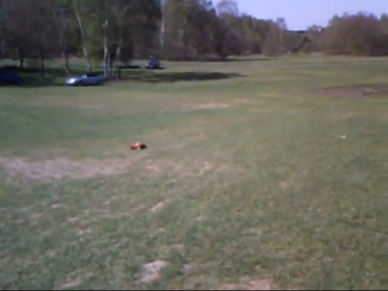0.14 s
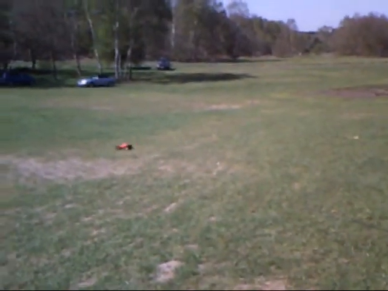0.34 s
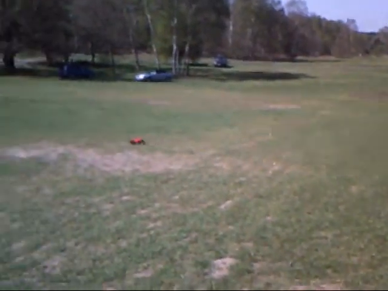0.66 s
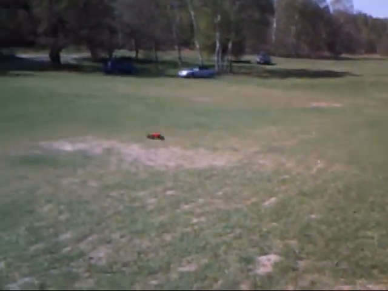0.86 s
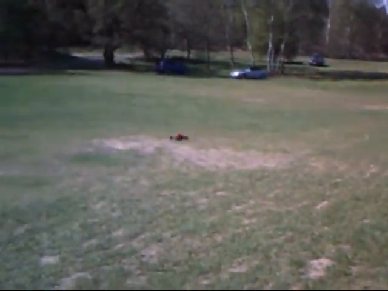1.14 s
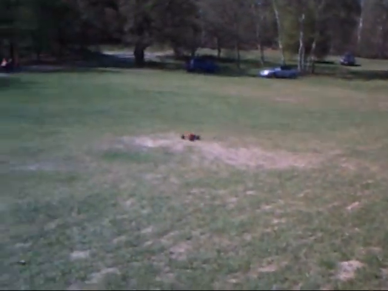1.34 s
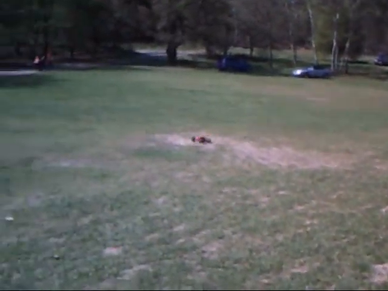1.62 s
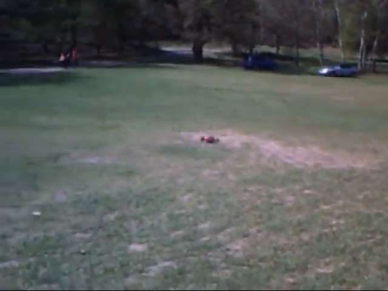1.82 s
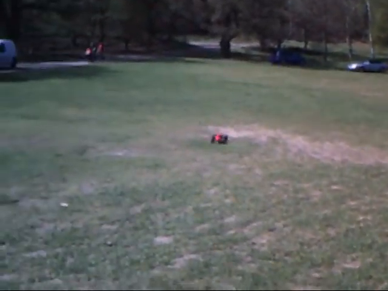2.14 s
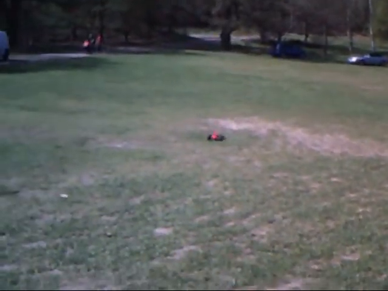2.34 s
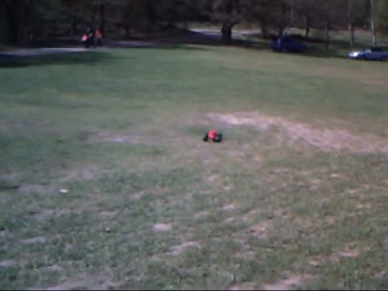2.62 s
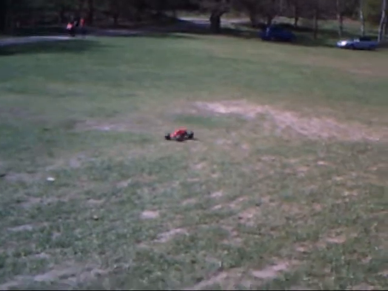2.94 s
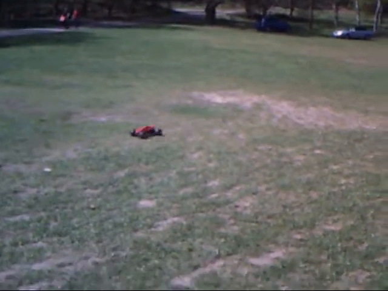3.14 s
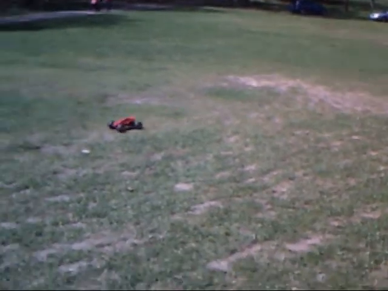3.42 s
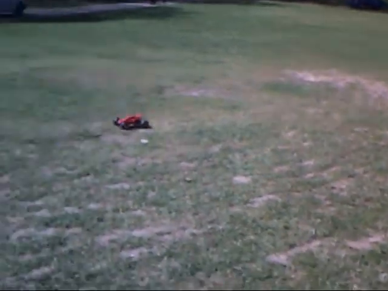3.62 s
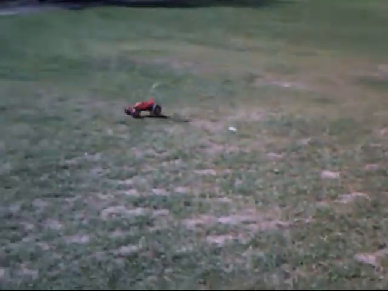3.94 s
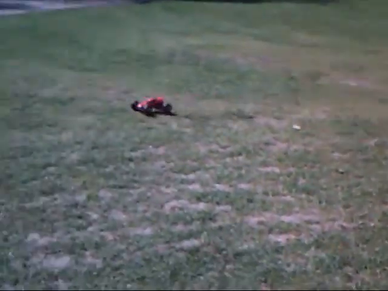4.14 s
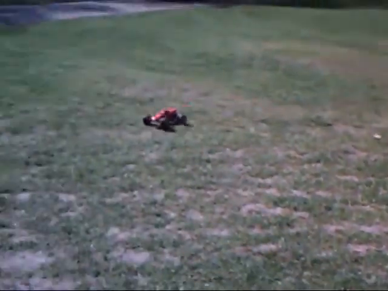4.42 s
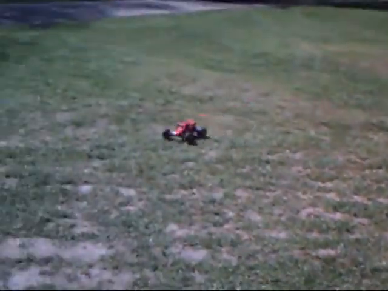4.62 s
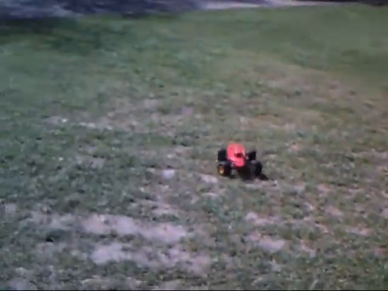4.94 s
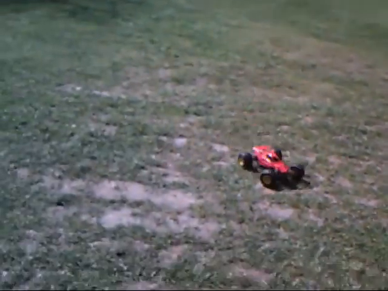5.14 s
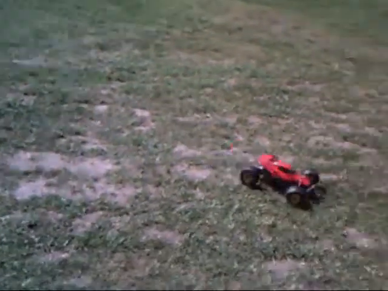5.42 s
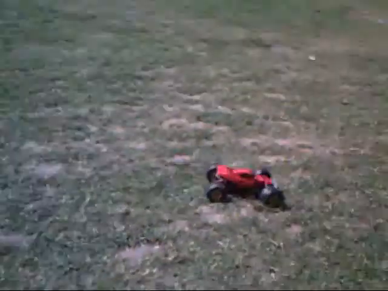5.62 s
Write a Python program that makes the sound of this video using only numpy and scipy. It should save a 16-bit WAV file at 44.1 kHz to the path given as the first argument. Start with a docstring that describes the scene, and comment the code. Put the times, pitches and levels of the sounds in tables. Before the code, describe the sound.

Outdoors on grass, a toy electric car gives a high, choppy whine that keeps sagging and spinning up again. Tyre rustle and rattling parts run beneath it, over soft wind and a faint low drone. As the car comes closer the whine strengthens, clusters of short plastic knocks appear, and scraping soil and rattle are strongest in the last second. The microphone sounds cheap, with a harsh, fizzy treble.

```python
"""On rough grass, a small electric buggy bounces towards a toy-grade camera. Each bite of its tyres loads
the motor, so the gear whine falls in pitch and grows louder; between bites the motor spins up. The tyres
tear grass and scrape soil, loose parts rattle, and blows ring the plastic chassis. Wind blows over a far
drone, a faint pulsing tone and a passing hum. The camera's converter holds each of about 8000 samples
a second, which mirrors the spectrum into the treble."""
import sys
import numpy as np
from scipy import signal
from scipy.fft import rfft, irfft, next_fast_len
from scipy.io import wavfile
from scipy.ndimage import uniform_filter1d, map_coordinates

SR = 44100
rng = np.random.default_rng(int(sys.argv[2]) if len(sys.argv) > 2 else 0)


def wav_record(signal):
    """Record a signal, one row per channel, as 16-bit PCM in the file named by sys.argv[1]."""
    frames = np.transpose(np.atleast_2d(signal))
    bounded = np.clip(frames, -1, 1)
    # unit amplitude maps onto the largest positive 16-bit level
    quanta = np.round(bounded * 32767).astype(np.int16)
    wavfile.write(sys.argv[1], SR, quanta)


N = 254456

# Each row: time of lowest speed in seconds, mesh pitch in Hz and whine in dB before the bite, the same
# two at lowest speed, seconds the speed stays low, seconds the grip lasts, overtone in relative dB.
TYRE_BITES = [(0.105, 2304, -31, 1879, -36, 0.00998, .02, -19),
              (0.174, 2060, -36, 2008, -35, 0.0032, .012, -21),
              (0.299, 2200, -39, 1739, -40, 0.0022, .025, -21),
              (0.427, 1990, -34, 1475, -34, .002, .022, -10),
              (0.557, 2300, -26, 1682, -35.5, 0.0035, .08, -8),
              (0.712, 2088, -36, 1672, -35.5, 0.0036, 0.06, -11.5),
              (0.832, 2127, -32, 1572, -36.5, 0.0017, 0.054, -9.5),
              (0.896, 1973, -27.5, 1857, -27, 0.0034, 0.028, -32),
              (0.957, 1976, -31.5, 1518, -29.5, 0.0082, 0.02, -15),
              (1.078, 2100, -25, 1553, -25.5, 0.024, .1, -22.5),
              (1.183, 1916, -27.5, 1707, -32, 0.0055, 0.065, -8),
              (1.271, 1794, -27.5, 1482, -26, 0.012, 0.071, -13),
              (1.333, 1756, -24.5, 1707, -29.5, .002, 0.053, -12.5),
              (1.406, 1764, -24.5, 1603, -26, .004, 0.08, -28),
              (1.49, 1900, -26.5, 1553, -21.5, 0.011, 0.075, -37),
              (1.603, 1960, -40, 1836, -29, 0.0063, .015, -16),
              (1.671, 1933, -26, 1499, -28.5, .006, .05, -23),
              (1.727, 1913, -28, 1822, -38, .002, .006, -21),
              (1.87, 2407, -32, 1386, -28.5, 0.0056, 0.038, -24),
              (2.004, 1840, -36, 1394, -27.5, .008, 0.028, -21),
              (2.178, 1662, -36, 1421, -30, .004, 0.035, -15),
              (2.35, 1523, -32, 1311, -32, .004, 0.049, -17),
              (2.488, 1656, -31, 1582, -37, 0.0034, .03, -29),
              (2.528, 1645, -32, 1580, -30, .012, 0.068, -17.5),
              (2.621, 1847, -29.5, 1580, -29, .006, .035, -15),
              (2.702, 1800, -27.5, 1400, -40, .015, 0.044, -23),
              (2.77, 1723, -18, 1534, -37, 0.0018, 0.032, -21),
              (2.895, 2045, -23.5, 1499, -25, .012, 0.038, -23),
              (3.074, 2340, -25, 1533, -24.5, 0.014, 0.083, -17),
              (3.18, 1987, -27, 1588, -23, .008, 0.075, -17),
              (3.272, 1965, -28.5, 1627, -24.5, 0.013, 0.074, -13),
              (3.356, 1955, -26, 1726, -20.5, .008, 0.084, -21),
              (3.434, 1907, -21.5, 1833, -22, 0.036, 0.073, -19),
              (3.555, 2050, -24.5, 1770, -21.5, 0.0082, 0.023, -18),
              (3.635, 2076, -22, 1943, -20.5, 0.041, 0.041, -27),
              (3.755, 2080, -22, 1750, -22, 0.0037, 0.02, -15),
              (3.872, 2100, -34, 1600, -26, 0.0021, 0.046, -21),
              (4.05, 3014, -27, 1583, -27.5, .012, 0.048, -6),
              (4.22, 2503, -25, 1710, -22, 0.0022, 0.044, -18),
              (4.342, 2336, -24, 1725, -16.5, 0.0061, 0.048, -26.5),
              (4.399, 1790, -22, 1675, -23, 0.0085, .05, -13.5),
              (4.501, 2127, -23.5, 1830, -18, 0.0052, 0.047, -27),
              (4.558, 1966, -23.5, 1740, -18.5, 0.0027, .03, -20.5),
              (4.594, 1850, -22, 1694, -17, 0.00803, 0.055, -21.5),
              (4.652, 1820, -20.5, 1711, -20, 0.00583, 0.075, -15.5),
              (4.747, 2046, -26, 1680, -18, 0.022, 0.073, -14.5),
              (4.899, 2231, -24.5, 1667, -23.5, 0.034, .11, -12.5),
              (5.03, 2130, -23, 1505, -22.5, .015, .12, -14.5),
              (5.165, 2260, -22.5, 1510, -27, 0.019, 0.074, -27),
              (5.258, 2143, -33, 1650, -24, .004, 0.01, -8),
              (5.285, 1697, -40, 1575, -22, 0.01198, 0.075, -18),
              (5.38, 2003, -30, 1523, -22, .025, 0.066, -10.5),
              (5.499, 1880, -29, 1498, -17, 0.013, 0.043, -15),
              (5.632, 2080, -30, 1475, -13, 0.024, 0.069, -14),
              (5.722, 1780, -26.5, 1623, -29, 0.0096, .008, 1),
              (5.762, 1707, -13.5, 1550, -14, .01, 0.023, -11.5)]
# Each row: time in seconds, base levels in dB of tearing grass, scraping soil and rattling parts.
ROLLING_LEVELS = [(0.0, -36.5, -42.5, -40.5), (0.61, -37.5, -41, -44), (0.87, -37.5, -37, -41.5),
                  (1.24, -37, -45, -40.5), (1.46, -37.5, -36.5, -41.5), (1.74, -34, -43, -43),
                  (2.25, -37.5, -40, -40), (2.97, -34, -39.5, -43.5), (3.33, -36.5, -41, -38),
                  (3.52, -36.5, -43, -41), (3.73, -34.5, -41.5, -39.5), (4.03, -33, -37.5, -38.5),
                  (4.4, -33.5, -38.5, -38), (4.69, -35.5, -32.5, -34.5), (5.05, -36, -33.5, -36.5),
                  (5.26, -36, -28, -29.5), (5.58, -34.5, -30, -31), (5.77, -37, -26.5, -31.5)]
# Each row: time in seconds, wind level in dB, centre of its moan in Hz.
WIND_COURSE = [(0, -43.5, 236), (1.2, -42, 216), (2.4, -44, 213), (3, -41.5, 231.7), (4.1, -42.5, 277.7),
               (4.7, -42.5, 320), (5.2, -38.5, 340), (5.77, -39.5, 322.9)]
# Each row: centre in Hz, width in Hz.
MOAN_BANDS = [(200, 79), (270, 70), (345, 69)]
# Each row: start in seconds, level in dB, dB added to the lowest mode, to tyre noise and to rattle.
CHASSIS_BLOWS = [(2.138, -16.5, -9, 5, 0), (2.771, -22, -6, 5.5, 4), (2.902, -19, -10, -1, 2),
                 (3.541, -17, -21, 5, 4), (3.563, -22, -8, 1, 0), (3.623, -21, -8, 7, -1),
                 (3.734, -23, -10, 4.5, 9), (3.791, -24, -7, 4, 3), (3.852, -32, -4, 1.5, 9),
                 (4.025, -24.5, 10, 2.5, 3), (4.047, -12, -16, 2.5, -4), (4.068, -20, -4, 4, 2),
                 (4.111, -19, 0, 0, 5.5), (4.139, -24, -4, 3, 2.5), (4.926, -27, 1, 3, 0),
                 (5.01, -21, 4, 3.5, 5), (5.063, -24, -2, 4, 7), (5.144, -32, 13, 3.5, 1.5),
                 (5.178, -18, -7, 10.5, 4.5), (5.248, -18, -3.5, 3, 6), (5.339, -16.5, -6, -1, -4),
                 (5.375, -23, 0, 2, 4), (5.435, -27, -1, 2, 5.5), (5.521, -19, -4, 2, 1.5),
                 (5.659, -19, -1, 0.5, 9), (5.747, -26, -3, 3, 3)]
# Each row: frequency in Hz, level in dB, seconds to decay by 60 dB.
CHASSIS_MODES = [(270, -6, .05), (620, -3, .02), (820, 0, .018), (1050, -1, .016), (1300, -4, .014)]
# Each row: frequency in Hz, gain in dB.
GEARBOX_TRANSMISSION = [(2600, -30), (3000, -10), (3250, 5), (3650, 5), (3850, -8), (4300, -68),
                        (5000, -50)]
GRASS_SPECTRUM = [(200, -4), (340, -19), (450, -16.5), (600, -8), (800, -2), (1000, -3.5), (1250, -7.5),
                  (1800, -9.5), (2500, -20), (4500, -25)]
SOIL_SPECTRUM = [(250, -45), (350, -3), (500, -32), (900, -16.5), (1200, 3), (1500, 0.5), (1800, -15.5),
                 (2300, -19), (3000, -34), (4500, -40)]
RATTLE_SPECTRUM = [(1200, -14), (2000, 4.5), (2500, -2.5), (2950, -5), (3400, 1.5), (3800, -1.5),
                   (4200, -8), (5000, -52)]
BREEZE_SPECTRUM = [(15, -7), (30, -34), (60, -5), (100, -6.5), (160, -4), (300, -7), (450, -6), (700, -6),
                   (1500, -27), (4000, -17.5)]
# Each row: time in seconds, level in dB.
DRONE_ENVELOPE = [(0, -54), (1, -44.5), (2.8, -43.5), (4, -35.5), (4.3, -40.5), (5.77, -49)]
PULSE_ENVELOPE = [(0, -48), (1.9, -50), (2.3, -48), (5.77, -63)]

BRAKE_HZ_PER_S, LONGEST_BRAKE_S, SPIN_HZ_PER_S = 14500, .028, 8500  # fall and recovery of mesh pitch
REBOUND_S, REBOUND_SHARE = .016, .35  # the first, quick part of the recovery
SLACK_DB, GRIP_LEAD_S = 11, .019  # drop in whine on free wheels; longest grip before lowest speed


def amp(db):
    """Amplitude ratio of a level in dB."""
    return 10 ** (np.asarray(db) / 20)


def unit(x):
    """Normalisation to rms 1."""
    return x / np.sqrt(np.mean(x ** 2) + 1e-20)


def curve(s, value):
    """Linear interpolation in time, one value per sample."""
    return np.interp(np.arange(N) / SR, np.maximum.accumulate(s), value)


def wobble(rate):
    """Smooth random modulation of rms 1, with rate knots a second."""
    knots = rng.standard_normal(int(N * rate / SR) + 4)
    return unit(map_coordinates(knots, [np.arange(N) * rate / SR]))


def spans(starts, lengths, values, edge_s):
    """A soft-edged gate: each value during its span, 0 elsewhere."""
    out = np.zeros(N)
    for s, length, value in zip(starts, lengths, values):
        out[round(s * SR):round((s + length) * SR)] = value
    return uniform_filter1d(out, size=round(edge_s * SR))


def filtered(x, response):
    """Linear filtering: the spectrum times a frequency response."""
    m = next_fast_len(N + SR // 2)
    return irfft(rfft(x, m) * response(np.fft.rfftfreq(m, 1 / SR)), m)[..., :N]


def coloured(x, spectrum):
    """Spectral shaping by (Hz, dB) points on a logarithmic axis."""
    hz, db = np.transpose(spectrum)
    return filtered(x, lambda f: amp(np.interp(np.log(f + 1), np.log(hz), db, -120, -120)))


def rush(spectrum, patchy_db, grain_db, grain_rate):
    """Coloured noise of rms 1, modulated in grains of time and patches of time and frequency."""
    grains = amp(grain_db * wobble(grain_rate))
    cells = signal.stft(rng.standard_normal(N) * grains, nperseg=512)[2]
    patches = uniform_filter1d(rng.standard_normal(cells.shape), size=6, axis=0)
    patches = unit(uniform_filter1d(patches, size=8, axis=1))
    noise = signal.istft(cells * amp(patchy_db * patches), nperseg=512)[1][:N]
    return unit(coloured(noise, spectrum))


def narrow(hz, width_hz):
    """Narrow-band noise, heard as an unsteady tone."""
    return unit(filtered(rng.standard_normal(N), lambda f: np.exp(-((f - hz) / width_hz) ** 2)))


def gears():
    """Tooth-mesh frequency follows motor speed. Returns the whine and the load, its dB about the trend."""
    slowest, top_hz, top_db, low_hz, low_db, hold, grip, overtone_db = np.transpose(TYRE_BITES)
    braking = np.minimum(abs(top_hz - low_hz) / BRAKE_HZ_PER_S, LONGEST_BRAKE_S)
    begins, freed = slowest - braking, slowest + hold
    recovery = abs(top_hz[1:] - low_hz[:-1]) / SPIN_HZ_PER_S
    spun_up = np.minimum(begins, np.r_[0, freed[:-1] + recovery])
    stages = np.c_[spun_up, begins, slowest, freed]
    rebound = np.minimum(freed + REBOUND_S, (freed + np.r_[spun_up[1:], N / SR]) / 2)
    rebound_hz = low_hz + REBOUND_SHARE * (np.r_[top_hz[1:], low_hz[-1]] - low_hz)
    mesh_hz = curve(np.c_[stages, rebound].ravel(),
                    np.c_[top_hz, top_hz, low_hz, low_hz, rebound_hz].ravel())

    lead = np.minimum(braking, GRIP_LEAD_S)
    gripping = slowest - lead, lead + grip
    slack = 1 - spans(*gripping, np.ones(len(grip)), edge_s=.0027)
    whine_db = curve(stages.ravel(), np.c_[top_db, top_db, low_db, low_db].ravel())
    whine_db -= (SLACK_DB + 3.1 * wobble(60)) * slack
    whine_db -= 1.9 * abs(wobble(45))  # chattering teeth lose contact
    load_db = whine_db - uniform_filter1d(whine_db, size=SR // 3)

    tooth_play = 1 + .013 * wobble(70) + .02 * wobble(220)
    phase = 2 * np.pi * np.cumsum(uniform_filter1d(mesh_hz, size=150) * tooth_play) / SR
    runout = 1 + .14 * np.sin(phase / 19 + 1.36 * wobble(5.4))  # a 19-tooth pinion runs out of true
    tone = amp(whine_db + 1.8 * wobble(140)) * runout * np.sin(phase)
    squeal = spans(*gripping, amp(low_db + overtone_db), edge_s=.0089)
    overtone = squeal * amp(2.94 * wobble(80)) * np.sin(2 * phase + .8 * wobble(240))
    return tone + coloured(overtone, GEARBOX_TRANSMISSION), load_db


def jolts(swell_db, rise_s=.006, decay_s=.028):
    """Superposed swells in dB, rising and decaying exponentially about each chassis blow."""
    t = np.arange(N) / SR - np.transpose(CHASSIS_BLOWS)[0][:, None]
    return swell_db @ np.exp(np.where(t < 0, t / rise_s, -t / decay_s))


def tyres(load_db):
    """Friction and small impacts make noise: grass, soil and rattle follow jolts, the last two load."""
    s, grass_db, soil_db, rattle_db = np.transpose(ROLLING_LEVELS)
    scuff_db, shake_db = map(jolts, np.transpose(CHASSIS_BLOWS)[3:])
    ground_db = scuff_db + .76 * wobble(11)  # uneven ground
    grass = amp(curve(s, grass_db) + ground_db)
    grass *= rush(GRASS_SPECTRUM, patchy_db=1, grain_db=.86, grain_rate=160)
    soil = amp(curve(s, soil_db) + ground_db + .12 * load_db)
    soil *= rush(SOIL_SPECTRUM, patchy_db=1, grain_db=1.1, grain_rate=160)
    rattle = amp(curve(s, rattle_db) + shake_db + 2.3 * wobble(19) + .028 * load_db)
    rattle *= rush(RATTLE_SPECTRUM, patchy_db=1.5, grain_db=1.6, grain_rate=220)
    return grass + soil + rattle


def wind():
    """Turbulence at the microphone gives broadband noise; a moan drifts across narrow bands."""
    s, wind_db, moan_hz = np.transpose(WIND_COURSE)
    centre_hz = curve(s, moan_hz)
    moan = sum(np.exp(-((centre_hz - hz) / 60) ** 2) * narrow(hz, width) for hz, width in MOAN_BANDS)
    breeze = rush(BREEZE_SPECTRUM, patchy_db=2.5, grain_db=.47, grain_rate=14)
    return amp(curve(s, wind_db)) * (breeze + amp(-4.5 + 1.2 * wobble(4.2)) * moan)


def far_drone(hz=42, drift=.0493):
    """Slow modulation of frequency and amplitude makes a low sinusoid waver."""
    phase = 2 * np.pi * np.cumsum(hz * (1 + drift * wobble(3.6))) / SR
    return amp(curve(*np.transpose(DRONE_ENVELOPE)) + 1.3 * wobble(5.15)) * np.sin(phase)


def pulsing_tone(hz=2362, pulse_hz=14.72):
    """Periodic amplitude modulation divides a faint, unsteady tone into even pulses."""
    t = np.arange(N) / SR
    gate = np.clip(.5 + np.cos(2 * np.pi * (pulse_hz * t + .08)), 0, 1)
    tone = np.sin(2 * np.pi * hz * t + wobble(90))
    return amp(curve(*np.transpose(PULSE_ENVELOPE)) + 1.8 * wobble(9)) * unit(gate * tone)


def passing_hum():
    """Noise confined to a narrow band is heard as a faint pitched hum."""
    return spans(starts=[2], lengths=[1.54], values=[amp(-49.5)], edge_s=.1) * narrow(353, width_hz=9.5)


def chassis_knocks(attack_s=.0008):
    """Impacts excite the damped modes of the plastic tub, each at a new strength every time."""
    out, t = np.zeros(N + SR), np.arange(SR // 10) / SR
    for s, db, thump_db, *_ in CHASSIS_BLOWS:
        levels = np.transpose(CHASSIS_MODES)[1] + rng.normal(0, 1.5, len(CHASSIS_MODES))
        levels[0] += thump_db
        ring = sum(amp(level - 60 * t / t60) * np.sin(2 * np.pi * hz * t)
                   for (hz, _, t60), level in zip(CHASSIS_MODES, levels))
        out[round(s * SR):][:len(t)] += amp(db) * ring * (1 - np.exp(-t / attack_s))
    return out[:N]


def scene():
    """Superposition of all sources at one microphone."""
    whine, load_db = gears()
    buggy = whine + tyres(load_db) + chassis_knocks()
    return (buggy + wind() + far_drone() + passing_hum() + pulsing_tone())[None]


def record(dry, hold_hz=8000.2, limit_hz=15450, dc_offset=-.1594):
    """A zero-order hold makes spectral images up to the band limit; the converter sits off centre."""
    n = np.arange(N)
    last_taken = np.ceil(np.floor(n * hold_hz / SR) * SR / hold_hz).astype(int)
    held = dry[:, np.minimum(last_taken, n)]
    return filtered(held, lambda hz: hz < limit_hz) + dc_offset


dry = scene()
out = record(dry)
wav_record(out)
```